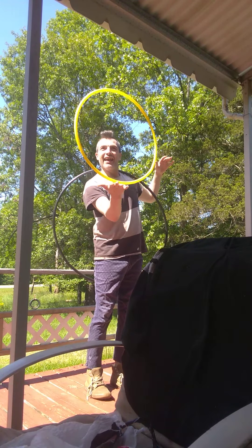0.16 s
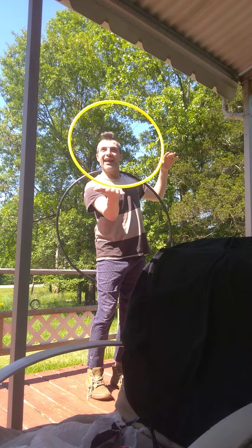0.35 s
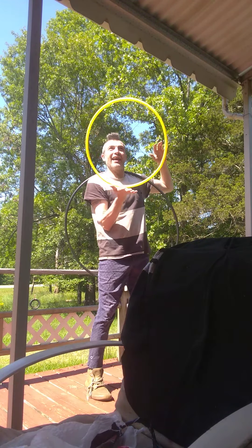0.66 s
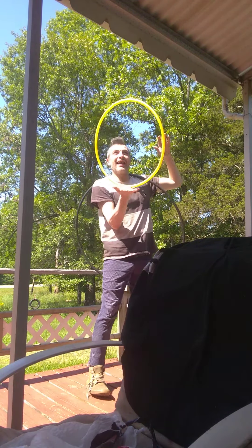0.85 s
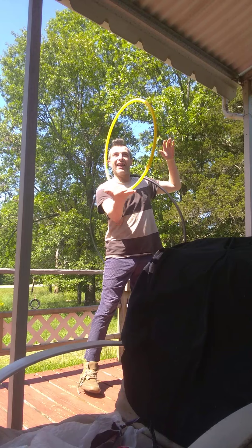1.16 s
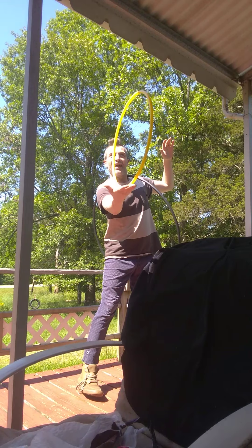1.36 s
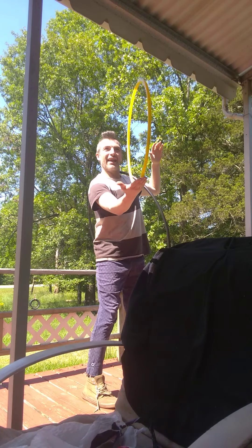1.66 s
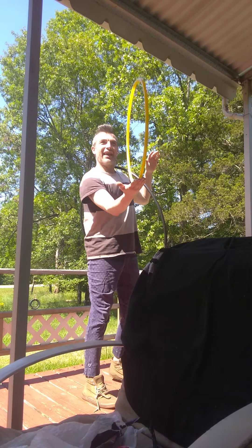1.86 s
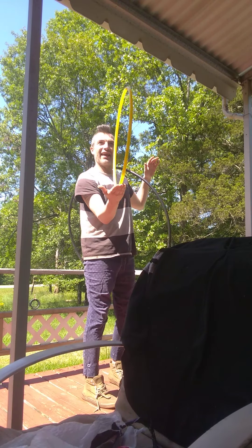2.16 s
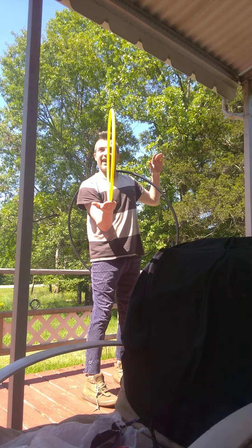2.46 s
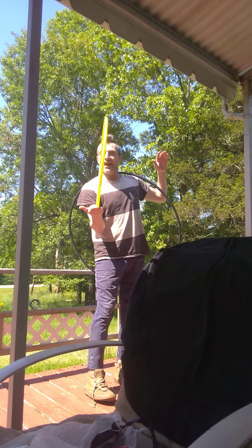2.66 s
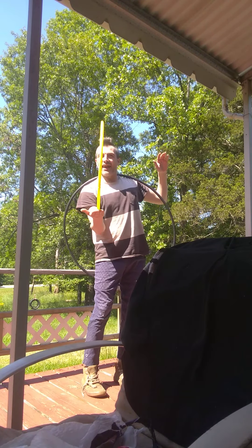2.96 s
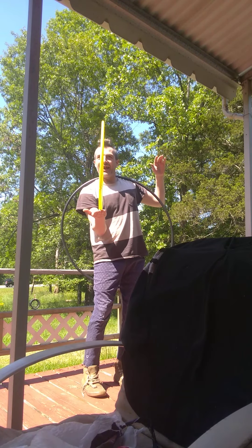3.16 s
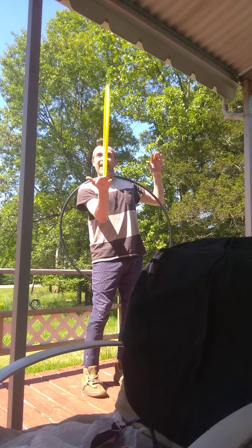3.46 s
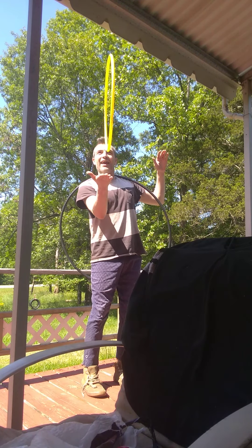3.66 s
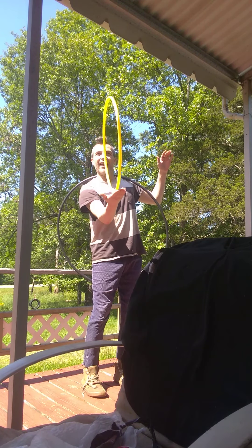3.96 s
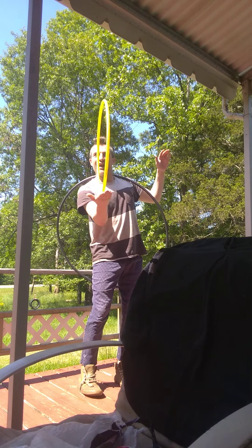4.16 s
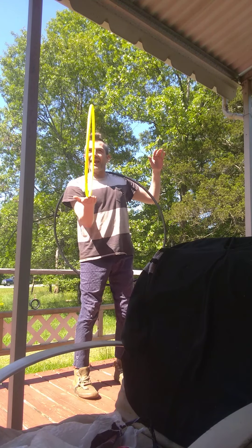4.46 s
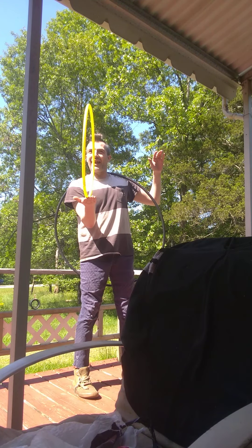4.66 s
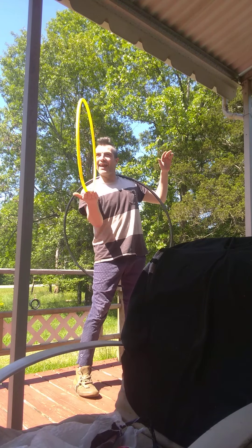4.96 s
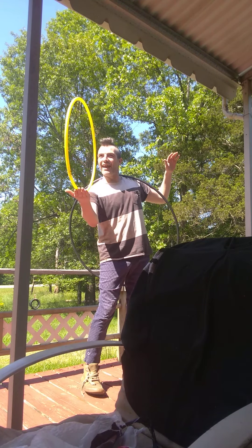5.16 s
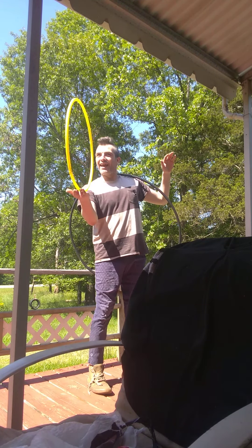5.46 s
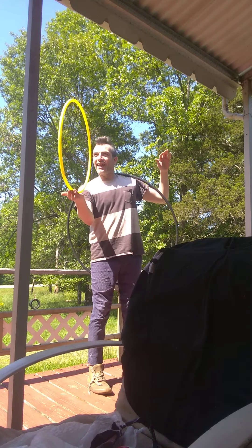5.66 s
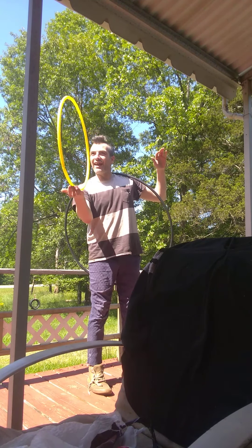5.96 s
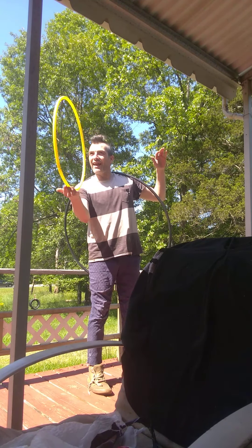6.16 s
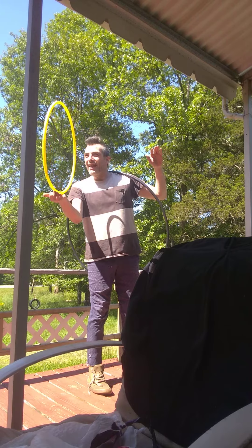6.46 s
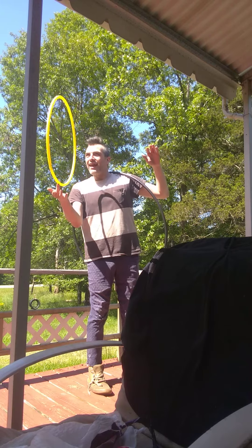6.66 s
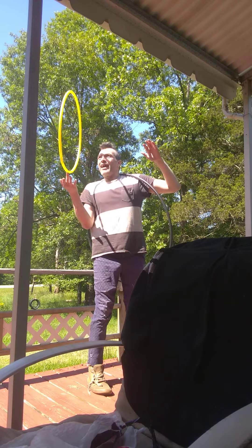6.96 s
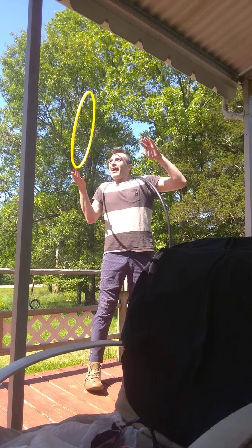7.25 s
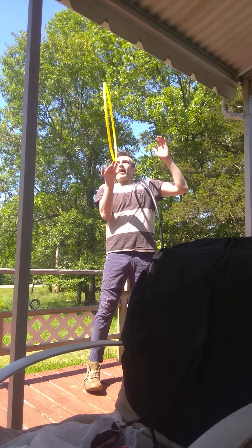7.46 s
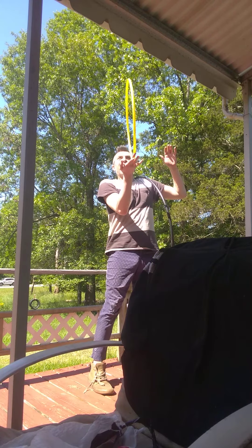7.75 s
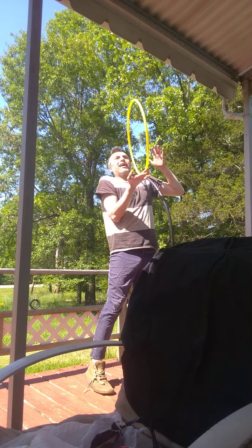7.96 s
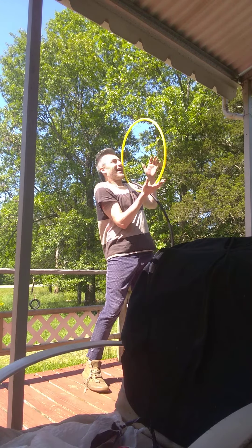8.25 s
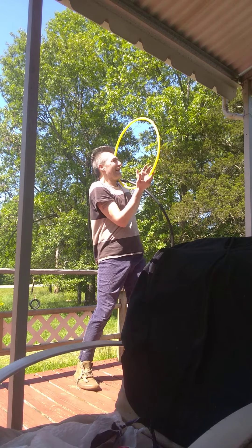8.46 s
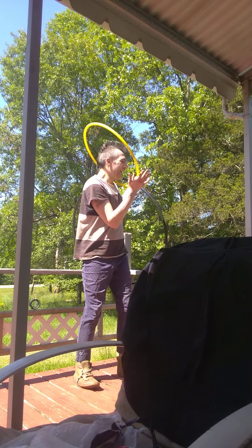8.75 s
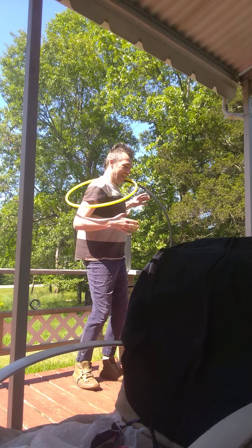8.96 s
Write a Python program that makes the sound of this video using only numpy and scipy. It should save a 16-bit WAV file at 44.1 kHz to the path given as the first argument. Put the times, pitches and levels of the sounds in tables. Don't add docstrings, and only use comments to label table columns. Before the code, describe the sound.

Outdoors near a road, captured by a small stereo recorder. From 0 to 2 seconds a soft, hollow rush of tyres builds, with a low engine murmur barely beneath it; faint short bird chirps come near 1 second and a tiny tick near 1.7. From about 2.5 seconds the deep engine tone swells, firm and throbbing by 4 to 4.5, around a low hum with buzzing overtones. Between 5 and 6.5 the tyres roar fullest, with gritty hiss and a rougher engine edge, while the pitch slides gently down. The hum wavers, surging near 7 and again at 8, then weakens towards 9. Occasional thin bird whistles lie far back. Close by, slight cloth crackles and dry ticks occur near 3.9, 4.2, 7.1 and 7.4; a sharp cluster snaps at 8.1, with more at 8.4 and 9.

```python
import sys
import numpy as np
from scipy import signal
from scipy.fft import rfft, irfft, next_fast_len
from scipy.io import wavfile
from scipy.ndimage import uniform_filter1d, map_coordinates

SR = 44100
rng = np.random.default_rng(int(sys.argv[2]) if len(sys.argv) > 2 else 0)


def amplitude_ratio(level_db):
    exponent = np.asarray(level_db, float) / 20
    return 10 ** exponent


def wav_out(sig):
    wavfile.write(sys.argv[1], SR, np.round(np.clip(np.atleast_2d(sig).T, -1, 1) * 32767).astype(np.int16))


N = 402015

# [t/s, f/Hz]
CYCLE_RATE = [(0, 20.87), (1, 20.84), (2, 20.73), (3, 20.66), (3.5, 20.6), (4, 20.48), (4.5, 20.36),
              (5, 20.16), (5.5, 19.85), (6, 19.61), (6.5, 19.29), (7, 19.03), (7.5, 18.75), (8, 18.58),
              (8.5, 18.52), (9.12, 18.5)]
# [t/s, rms level/dB]
FIRING = [(0.0, -55), (0.8, -46), (1.3, -61), (1.9, -44), (2.5, -42), (2.95, -33), (3.65, -28),
          (4.1, -25.5), (4.4, -25), (5.0, -28), (5.45, -28), (5.7, -30), (7.13, -26), (7.4, -30),
          (7.97, -24.5), (8.18, -32.5), (8.65, -28.0), (9.12, -37.5)]
MAIN_ORDERS = [3, 5, 6, 7, 9, 10, 11, 12, 13, 16, 25]
# [order, level/dB]
UNEVEN_ORDERS = [(4, -16.5), (14, -9), (15, -7.5), (17, -4), (18, -0.5), (19, -15), (21, -10.5), (24, 3),
                 (26, -1), (27, -5.5), (28, 5.5)]
# [level/dB, share of the firing swell, cancelled at t/s, again after t/s]
WALL_FADES = [(-59.5, -0.16, 7.0, 7.7), (-45.5, 0.09, .35, 3.9), (-47, 0.43, 3, 5.1),
              (-36.5, 0.95, 3.37, 5.0), (-35.5, 0.49, 1.4, 8.1), (-39, 0.79, 5.9, 14),
              (-35.5, 0.45, 5.13, 11.5), (-49, -0.16, 0.34, 9.9), (-42, 0.44, 6.1, 1.85),
              (-55, 0.08, 3.95, 4.6), (-65.5, -0.18, 0.05, 10.7)]
WALL_ECHO, FIRING_REF_DB = 0.6, -21.5
# [t/s, length/s, level/dB]
HEDGE_GAPS = [
    (4.853, .7, 6),
    (5.95, 0.92, 10.5),
]
HEDGED_FROM_ORDER = 13.5
SHADOWED_ORDERS = range(9, 14)
CLEARS_S, CLEARING_S, SHADOW_DB = 2.4, 0.57, -14
# [t/s, order, length/s, level/dB]
GLINTS = [(2.4, 13, .5, 11.5), (3.097, 10.6, 0.65, 3), (3.2, 12, .8, -7), (3.802, 11, .3, 3),
          (4.1, 3, 0.93, -7.5), (4.202, 6, .6, -2), (4.2, 16, .8, 8), (4.4, 13, 0.25, -6),
          (4.5, 15, 0.49, 7.5), (4.547, 7, 0.84, 0), (5, 14, .4, 8), (5.15, 3, 0.41, 7), (5.3, 15, 0.33, 9),
          (5.4, 10, .6, 6), (5.5, 16, 0.56, -9.5), (5.55, 5, 0.64, 4.5), (5.6, 13, 0.27, 6),
          (5.8, 11, 0.54, 2), (5.898, 6, 1, 3), (6.1, 13.6, .35, 13.5), (8.6, 10.5, .3, 4.5),
          (3.4, 14, .6, -7.5), (4.3, 19, .6, 9.5), (3.7, 21, .5, 12), (6.5, 12, 0.71, 9),
          (6.796, 13, .3, 6), (6.8, 10, .3, 4), (7.4, 10, .3, 5.5), (7.4, 13, 0.35, 6), (7.5, 11, 0.5, 2),
          (8, 6, 1.7, -12), (8.001, 7, 1.1, -4.5), (8.3, 13, 0.45, 8), (8.3, 9, .3, -4.5)]
GLINT_ORDERS = 0.6
# [t/s, length/s, level/dB, phase slip/rad]
POSTS = [(2.105, 0.17, -5.5, 1), (3.05, .1, -2.5, .4), (4.087, 0.11, -8, -1), (4.854, 0.11, -1.5, .3),
         (5.05, 0.11, -3, 0.38), (5.335, .06, -2.5, .1), (5.582, 0.065, -5.5, .6),
         (5.721, 0.058, -3.5, -1.1), (6.052, .1, -1, .4), (6.46, 0.12, -3.5, -.4), (7.256, .1, -2, .4),
         (8.154, .1, -2, -.5)]

# [t/s, level/dB, coarseness/dB]
ROAD = [(0.0, -40, 0), (1.6, -36, -1.5), (1.98, -32.5, 2.5), (2.69, -36, 1), (3.63, -32.5, -1),
        (3.73, -34.5, -1), (5.38, -30.5, 1), (5.81, -34, 1), (5.97, -30, 1.5), (6.88, -32, -0.5),
        (7.21, -31, -2.5), (7.57, -32.5, -1.5), (7.82, -31.5, -0.5), (8.02, -32, 0.5), (8.18, -34, -0.5),
        (8.35, -31, 0.5), (8.58, -33.5, 0), (9.12, -32, -1)]
# [f/Hz, level per Hz/dB]
RUMBLE = [(22, -36), (40, -16.5), (60, -9.5), (100, -3.5), (170, 5.5), (260, -7), (350, -4), (450, -7),
          (520, 0), (650, -37), (900, -78.5)]
DRONE = [(300, -32.5), (450, -7), (600, -0.5), (720, 3.5), (820, 5.5), (950, 3.5), (1150, -12),
         (1600, -48.5)]
ROAR = [(600, -21.5), (850, -9.5), (1050, -0.5), (1300, -4), (1600, -8.5), (2000, -16), (2600, -25),
        (4000, -84.5)]
HISS = [(1200, -40), (2000, 9.5), (2500, 2.5), (3000, -1.5), (4000, -12), (5000, -19), (8000, -49)]
SPRAY = [(2500, -12), (4000, 9.5), (5000, 0), (6500, 1.5), (7500, -10), (9500, -19.5)]
# [f/Hz, level/dB]
SILENT_ENDS = [(5, -120), (22000, -120)]
HISS_DB, HISS_GROWS = -14, 0.75
GRIT_DB, GRIT_NEAR_DB, GRIT_GROWS = -70, 5, 0.35
NEAREST_S, NEAR_FOR_S = 5.7, 0.92

# [f/Hz, level/dB]
SCATTER = [(5000, -28.5), (6700, -16), (7500, -3), (9000, -7.5), (11000, -16.5), (14200, -26.5),
           (14330, -58)]
BUFFET = [(25, -27), (45, -7.5), (65, 1), (90, 5), (130, -5), (300, -15), (560, -9.5), (800, -43.5)]
CAPSULE = [(3000, -12.5), (6000, 0), (9000, 0.5), (12000, -3), (14200, -3.5), (14330, -51.5)]

# [t/s, length/s, level/dB, centre f/Hz]
RUSTLES = [(0.573, 0.098, -61.5, 6530), (0.688, .05, -67, 6600), (.81, .04, -71, 7000),
           (1.752, 0.077, -60, 4600), (2.9, 0.11, -64, 5300), (3.918, .02, -66, 6060),
           (4.21, 0.043, -59, 4020), (7.142, 0.037, -67, 7460), (7.452, 0.069, -62.5, 4500),
           (8.071, 0.049, -54, 4940), (8.133, 0.035, -59.5, 5920), (8.582, 0.035, -66.5, 7008),
           (8.89, 0.098, -67, 6150), (9.051, .04, -59, 5000)]
# [t/s, length/s, start f/Hz, end f/Hz, level/dB]
BIRDS = [(0.704, 0.16, 6270, 5500, -74), (1.009, 0.031, 3090, 2880, -52.5), (1.138, 0.01, 3060, 2840, -53),
         (1.15, 0.05, 2600, 2590, -60), (1.589, 0.19, 7270, 4580, -70.5), (1.708, 0.15, 4340, 4160, -64.5),
         (2.332, .038, 2948, 3015, -52.5), (2.372, .04, 2990, 3000, -62), (4.338, 0.057, 3500, 3660, -64),
         (5.047, 0.083, 4200, 3940, -58), (6.413, 0.18, 3520, 3354, -59), (8.096, 0.11, 3920, 4100, -60.5),
         (8.952, 0.097, 3410, 3560, -58)]
BLURRED_S = 0.12
# [t/s, peak level/dB, brightness/dB per octave]
TICKS = [(1.668, -58, -5), (3.9245, -58, 1), (4.2127, -53.5, -0.5), (7.146, -56, -1), (7.446, -54.5, -1),
         (8.0732, -39.5, 1), (8.0769, -33, -1.5), (8.0845, -50.5, -1), (8.0882, -49, -3.5),
         (8.1062, -49.5, -6), (8.1365, -45, 3), (8.142, -49, 1), (8.151, -53, -1), (8.4165, -40, 0),
         (8.422, -53.5, 2), (8.431, -53.5, -1), (9.0462, -44, 2)]
# [f/Hz, level/dB]
CREAK = [(2000, -26.5), (3500, -2.5), (5000, 8), (7000, 4.5), (10000, -3.5), (14000, -7.5)]

# [f/Hz, likeness 0-1]
ALIKE = [(60, .6), (150, .9), (550, .6), (1600, .7), (2600, .45), (5000, .35), (7000, .3)]
# [f/Hz, level/dB]
WIDTH = [(60, 21), (150, -2.5), (550, -9.5), (1100, -2.5), (2000, -3), (5000, 0.5), (14000, -4)]
# [f/Hz, level/dB]
LEAN = [(60, 4), (120, 6.5), (240, 4.5), (470, 4.5), (920, 0.5), (1830, 1.5), (3620, 2.5), (7180, 3),
        (14200, 0.5)]
# [t/s, level/dB]
BEARING = [(0, -1), (2.2, -1), (2.7, -1), (4, -1), (6, -0.5), (7.5, -2), (9.12, -1.5)]
COMB_HZ, FLIP_HZ = 2124, 592
STEREO_BANDS = [0, 192, 208, 224, 240, *range(256, 417, 32)]


def unit(x):
    return x / np.sqrt(np.mean(x ** 2) + 1e-20)


def along(points, hz):
    f, v = np.transpose(points)
    return np.interp(np.log(hz + 1), np.log(f + 1), v)


def curves(rows):
    s, *cols = np.transpose(rows)
    return np.array([np.interp(np.arange(N) / SR, s, c) for c in cols])


def spread_out(coarse):
    return np.interp(np.arange(N), 64 * np.arange(len(coarse)), coarse)


def wobble(rate):
    knots = rng.standard_normal(int(N * rate / SR) + 4)
    coarse = np.arange(0, N + 64, 64)
    return spread_out(map_coordinates(knots, [coarse * rate / SR]))


def bump(s, length):
    coarse = np.arange(0, N + 64, 64)
    return np.exp(-4 * ((coarse / SR - s) / length) ** 2)


def filtered(x, response):
    m = next_fast_len(x.shape[-1] + 8192)
    spectrum = rfft(x, m) * response(np.fft.rfftfreq(m, 1 / SR))
    return irfft(spectrum, m)[..., :x.shape[-1]]


def rush(spectrum, patchy_db):
    z = signal.stft(rng.standard_normal((2, N)), nperseg=512)[2]
    patches = uniform_filter1d(rng.standard_normal(z.shape[1:]), size=4, axis=0)
    patches = unit(uniform_filter1d(patches, size=24, axis=1))
    pair = signal.istft(z * amplitude_ratio(patchy_db * patches), nperseg=512)[1][:, :N]
    closed = [SILENT_ENDS[0], *spectrum, SILENT_ENDS[1]]
    return unit(filtered(pair, lambda hz: amplitude_ratio(along(closed, hz))))


def order_levels():
    t = np.arange(N) / SR
    firing_db = curves(FIRING)[-1]
    open_db = sum(db * np.sin(np.pi * np.clip((t - s) / length, 0, 1)) ** 0.5 for s, length, db in HEDGE_GAPS)
    shadow_db = SHADOW_DB * np.clip((CLEARS_S - t) / CLEARING_S, 0, 1)
    levels = []
    for k, (db, share, s, again) in zip(MAIN_ORDERS, WALL_FADES):
        echo_phase = 2 * np.pi * (t - s) / again
        level = db + share * (firing_db - FIRING_REF_DB)
        level = level + 10 * np.log10(1 + WALL_ECHO ** 2 - 2 * WALL_ECHO * np.cos(echo_phase))
        if k > HEDGED_FROM_ORDER:
            level = level + open_db
        if k in SHADOWED_ORDERS:
            level = level + shadow_db
        levels.append(level)
    return firing_db, levels


def engine(stray=0.22, spread=0.13, flutter_db=1.4, far_db=-6, drift_db=0.66, hunt=0.062, shake=0.021):
    rate_hz = curves(CYCLE_RATE)[0]
    firing_db, levels = order_levels()
    turn = 2 * np.pi * np.cumsum(rate_hz) / SR
    turn = turn + hunt * wobble(1.191) + shake * wobble(8)
    cut_db = spread_out(sum(db * bump(s, length) for s, length, db, _ in POSTS))
    slip = spread_out(sum(rad * bump(s, length) for s, length, _, rad in POSTS))
    out = np.zeros((2, N))
    for k, extra_db in [(8, 0)] + [(k, 0) for k in MAIN_ORDERS] + list(UNEVEN_ORDERS):
        firing, away = k == 8, abs(k - 8)
        if firing:
            level = firing_db
        else:
            place = np.interp(k, MAIN_ORDERS, np.arange(len(MAIN_ORDERS)))
            below = min(int(place), len(MAIN_ORDERS) - 2)
            level = levels[below] + (place - below) * (levels[below + 1] - levels[below])
        glint_db = sum(db * np.exp(-((k - order) / GLINT_ORDERS) ** 2) * bump(s, length)
                       for s, order, length, db in GLINTS)
        level = level + spread_out(glint_db) + cut_db / (1 + away)
        level = level + extra_db + flutter_db * wobble(9) + (not firing) * drift_db * wobble(2.5)
        size = np.sqrt(2) * amplitude_ratio(level)
        phase = firing * slip + spread * (k - 8) ** 3 + stray * (1 + away) * wobble(1.5)
        out[0] += size * np.cos(k * turn + phase)
        out[1] += size * amplitude_ratio(far_db) * np.cos(k * turn + 2 * wobble(0.53))
    return out


def grit_db():
    level_db = curves(ROAD)[0]
    near = 1 / (1 + ((np.arange(N) / SR - NEAREST_S) / NEAR_FOR_S) ** 2)
    return GRIT_DB + GRIT_NEAR_DB * near + GRIT_GROWS * (level_db - level_db.mean())


def road():
    level_db, coarse_db = curves(ROAD)
    usual_db = level_db.mean()
    rumble_db = level_db - 5.5 + 0.45 * wobble(1.2)
    drone_db = level_db - 2.06 + coarse_db + 0.66 * wobble(7)
    roar_db = level_db - 1.65 - 0.66 * coarse_db + 0.73 * wobble(6)
    hiss_db = usual_db + HISS_DB + HISS_GROWS * (level_db - usual_db) + 0.6 * wobble(4) + 0.34 * wobble(9)
    spray_db = grit_db() + 6 + 1.2 * wobble(17)
    rumble = amplitude_ratio(rumble_db) * rush(RUMBLE, patchy_db=2.0)
    drone = amplitude_ratio(drone_db) * rush(DRONE, patchy_db=1.62)
    roar = amplitude_ratio(roar_db) * rush(ROAR, patchy_db=1.5)
    hiss = amplitude_ratio(hiss_db) * rush(HISS, patchy_db=1.2)
    spray = amplitude_ratio(spray_db) * rush(SPRAY, patchy_db=2.0)
    return rumble + drone + roar + hiss + spray


def loose_air():
    leaves = amplitude_ratio(grit_db() - 7.5 + 1.3 * wobble(11)) * rush(SCATTER, patchy_db=2.5)
    eddies = amplitude_ratio(-55.5 + 1.7 * wobble(0.81)) * rush(BUFFET, patchy_db=1.5)
    capsules = amplitude_ratio(-78.5) * rush(CAPSULE, patchy_db=-5.0)
    return (leaves + eddies + capsules) * amplitude_ratio([[2.2], [-2.2]])


def cloth(top_hz=14300):
    out = np.zeros((2, N + SR))
    for s, length, db, centre_hz in RUSTLES:
        u = np.arange(int(length * SR)) / (length * SR)
        draw = rng.standard_normal((3, SR // 8))
        grain = amplitude_ratio(3.2 * unit(uniform_filter1d(draw[2], size=120)))
        colour = lambda hz: (hz / centre_hz) ** 3 / (1 + (hz / centre_hz) ** 5.7) * (hz < top_hz)
        fibres = unit(filtered(draw[:2] * grain, colour))[:, :len(u)]
        out[:, round(s * SR):][:, :len(u)] += amplitude_ratio(db) * fibres * np.sin(np.pi * u ** 0.51)
    return out[:, :N] * amplitude_ratio([[3.2], [-3.2]])


def birds():
    out = np.zeros(N + SR)
    for s, length, start_hz, end_hz, db in BIRDS:
        blur = min((length / BLURRED_S) ** 2, 1)
        u = np.arange(int(length * SR)) / (length * SR)
        noise = rng.standard_normal(len(u))
        scatter = unit(signal.fftconvolve(noise, np.hanning(SR // 500), "same"))
        tone = np.sin(2 * np.pi * np.cumsum(start_hz + (end_hz - start_hz) * u) / SR)
        swell = np.sin(np.pi * u) ** 0.25 * amplitude_ratio(5.3 * (u - 0.5))
        out[round(s * SR):][:len(u)] += amplitude_ratio(db + 9.5) * swell * (1 - blur + blur * scatter) * tone
    t = np.arange(SR // 4) / SR
    echo = amplitude_ratio(-60 * t / 0.22) * rng.standard_normal(len(t))
    wet = signal.fftconvolve(out, amplitude_ratio(-7) * echo / np.linalg.norm(echo))
    return np.array([out[:N] + wet[:N], wet[200:N + 200]])


def chair():
    out, t = np.zeros((2, N + SR)), np.arange(500) / SR
    lead_in = 50
    for s, db, tilt_db in TICKS:
        snap = rng.standard_normal((3, len(t))) * amplitude_ratio(-60 * t / 0.005)
        pair = np.pad(0.8 * snap[0] + 0.6 * snap[1:], [(0, 0), (lead_in, 0)])
        colour = lambda hz: amplitude_ratio(along(CREAK, hz) + tilt_db * np.log2((hz + 1) / 7000))
        out[:, round(s * SR) - lead_in:][:, :len(t) + lead_in] += amplitude_ratio(db) * filtered(pair, colour)
    return out[:, :N] * amplitude_ratio([[3.6], [-3.6]])


def ports(pair):
    lead = lambda hz: np.pi * (hz / COMB_HZ - (hz > FLIP_HZ) / 2)
    alike = lambda hz: np.clip(along(ALIKE, hz), 0, 1)
    shares = lambda hz: np.array([alike(hz), np.sqrt(1 - alike(hz) ** 2)])
    apart = lambda hz: 1j * np.sin(lead(hz)) * amplitude_ratio(along(WIDTH, hz)) * shares(hz)
    mid = filtered(pair[0], lambda hz: np.cos(lead(hz)))
    side = filtered(pair, apart).sum(axis=0)
    steeper = lambda hz: np.where(hz > FLIP_HZ, 1.72 + 0.14 * np.sin(2 * lead(hz)) ** 2, 1)
    lean_db = lambda hz: along(LEAN, hz) * steeper(hz)
    return filtered(np.array([mid + side, mid - side]), lambda hz: amplitude_ratio(lean_db(hz) * [[0.5], [-0.5]]))


def joint_stereo(x, masked_db=-12, rise_db=2.2, drift_db=4):
    z = signal.stft([x[0] + x[1], x[0] - x[1]], SR, nperseg=2048)[2]
    power = np.add.reduceat(np.abs(z) ** 2, STEREO_BANDS, axis=1)
    drift = unit(uniform_filter1d(rng.standard_normal(power.shape[1:]), size=4))
    rise = np.log(1 + np.arange(len(STEREO_BANDS)))[:, None]
    margin_db = masked_db + rise_db * rise + drift_db * drift
    kept = power > amplitude_ratio(2 * margin_db) * power[::-1]
    kept[:, 0] = kept[:, -1] = kept[..., -3:] = True
    gate = np.repeat(kept, np.diff([*STEREO_BANDS, z.shape[1]]), axis=1)
    mid, side = signal.istft(z * gate, SR, nperseg=2048)[1][:, :N] / 2
    return np.array([mid + side, mid - side])


def scene():
    bearing_db = curves(BEARING) * [[0.5], [-0.5]]
    distant = ports(engine() + road() + birds()) * amplitude_ratio(bearing_db)
    return distant + loose_air() + cloth() + chair()


def low_pass(x):
    return signal.sosfilt(signal.butter(12, 14820, fs=SR, output="sos"), x)


def record(dry):
    limited = filtered(dry, lambda hz: hz < 14450)
    mix = joint_stereo(limited)
    return low_pass(mix)


dry = scene()
out = record(dry)
wav_out(out)
```